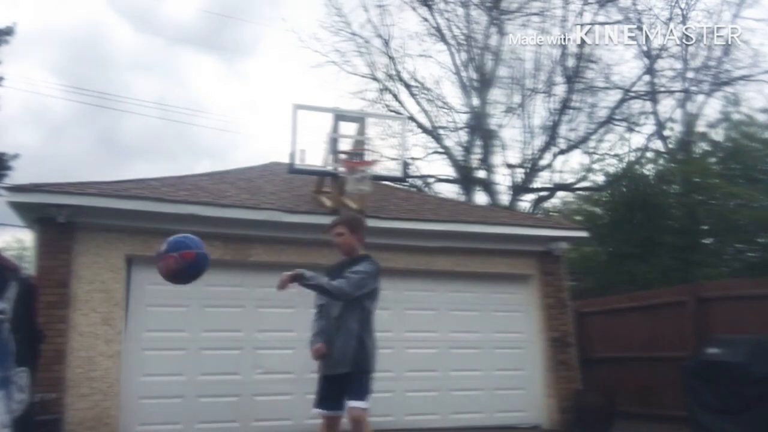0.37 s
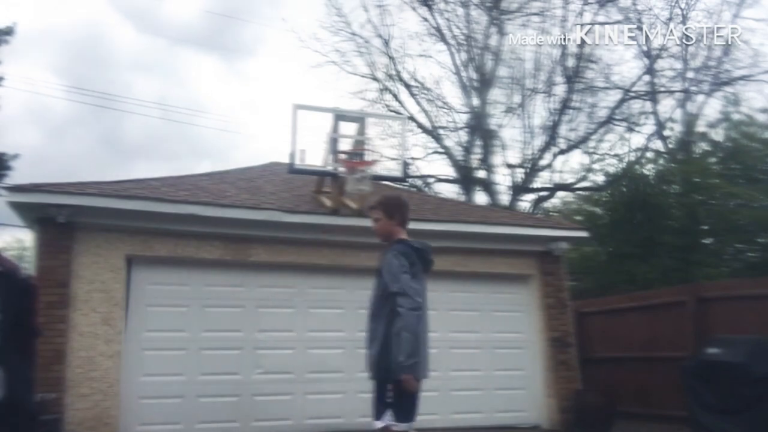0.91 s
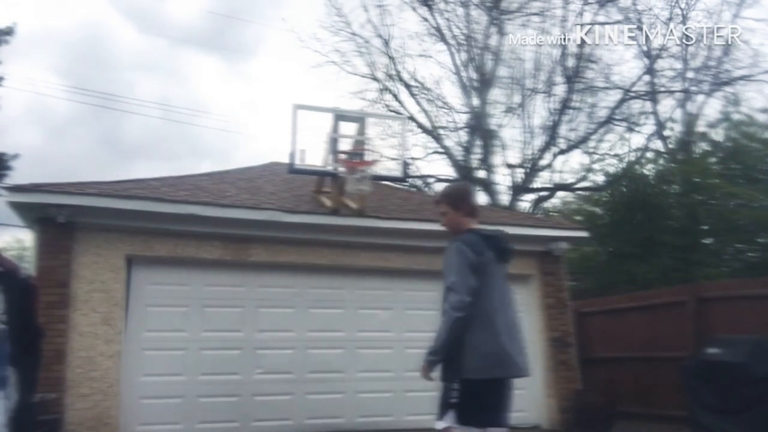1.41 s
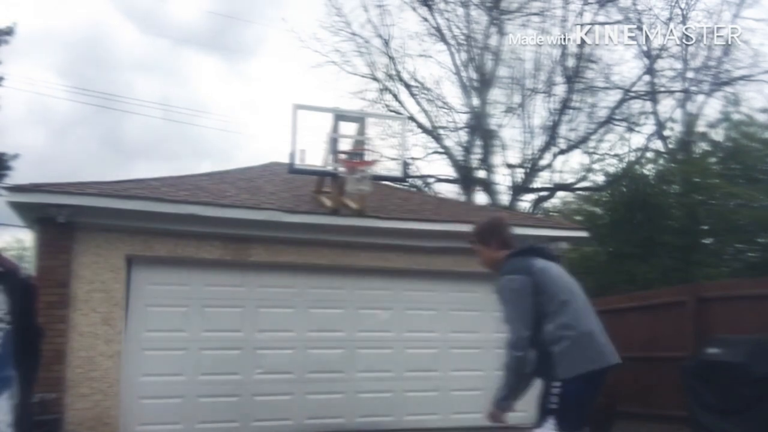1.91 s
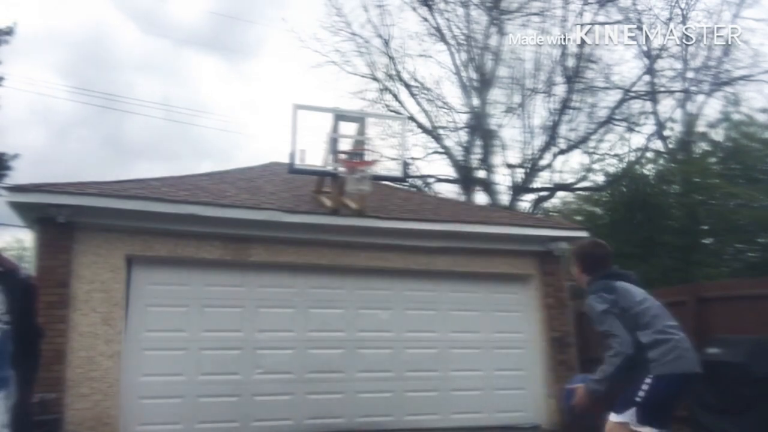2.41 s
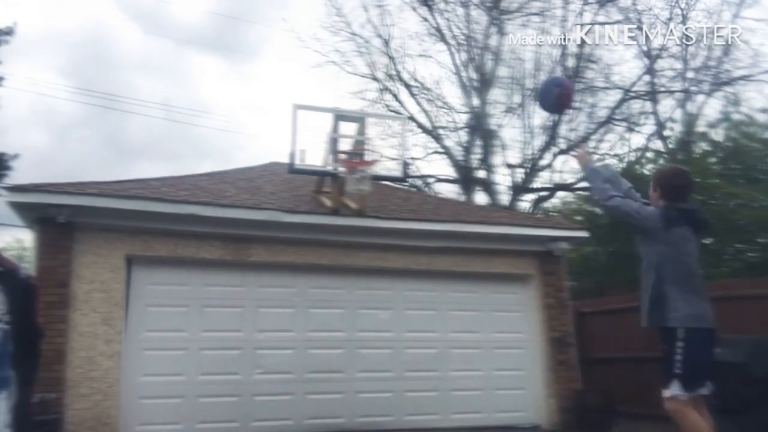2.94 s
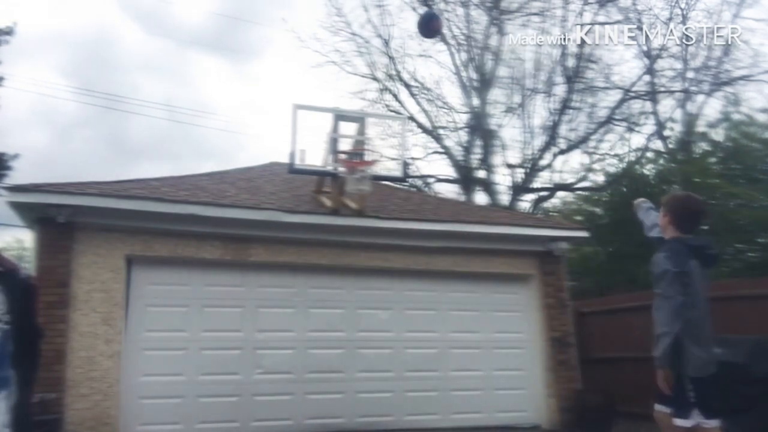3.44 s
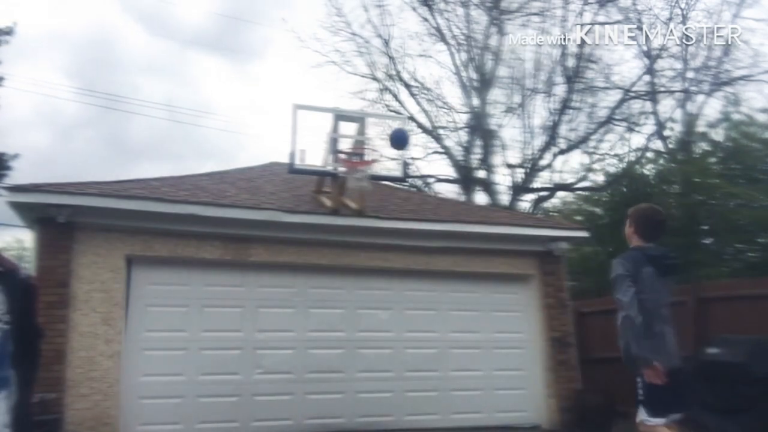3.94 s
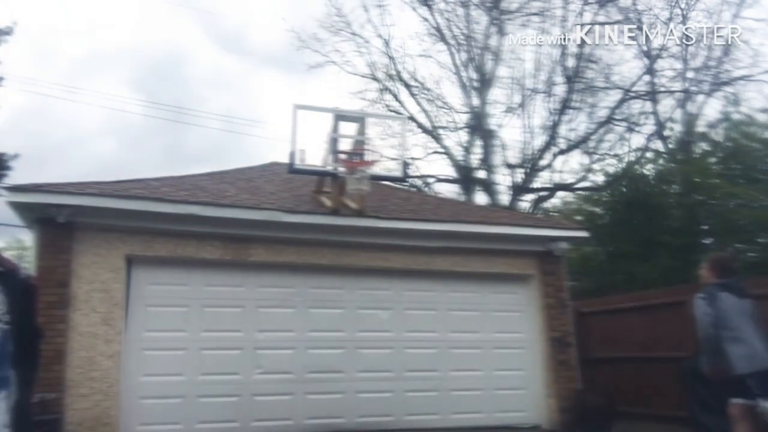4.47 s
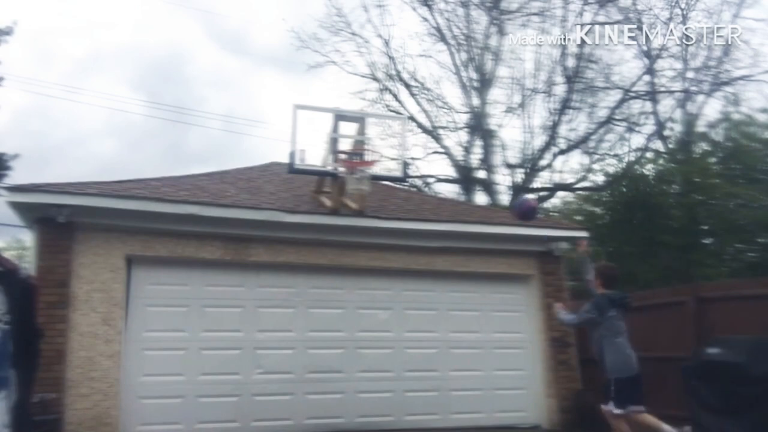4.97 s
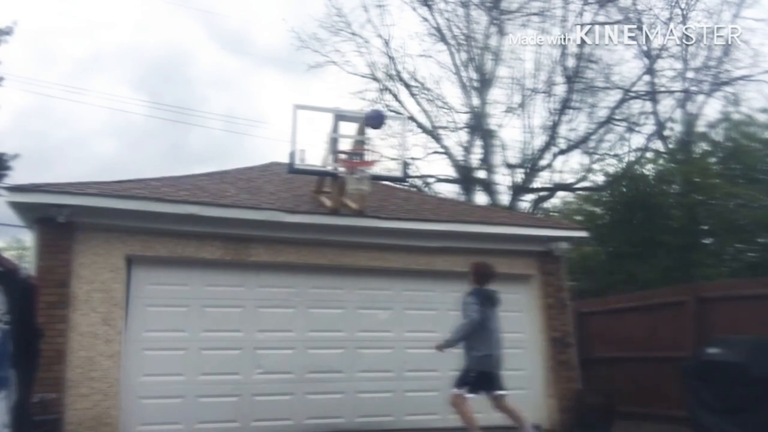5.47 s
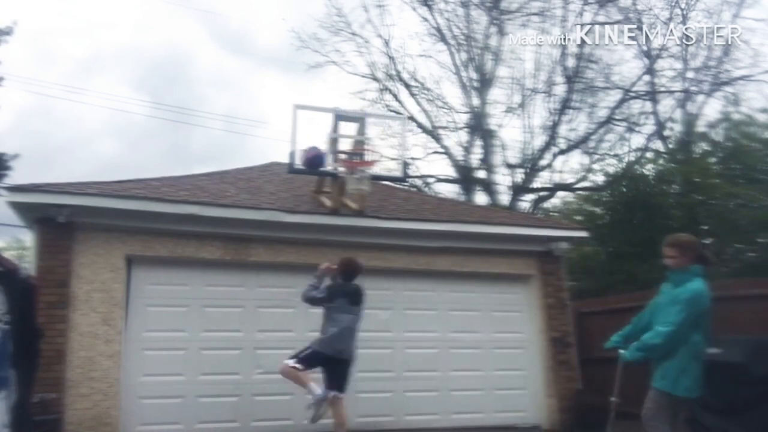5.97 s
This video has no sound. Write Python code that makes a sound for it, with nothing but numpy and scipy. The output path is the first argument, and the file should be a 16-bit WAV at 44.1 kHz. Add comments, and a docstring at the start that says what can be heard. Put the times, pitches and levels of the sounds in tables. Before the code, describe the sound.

Sharp rubbery ball slaps and ringing bounces on wet concrete, gritty scuffs between, faint rain and far traffic, with two brief level dropouts.

```python
"""Light rain hisses over far traffic, then a basketball is caught, bounced and shot on a wet concrete driveway.
Rain and traffic are shaped noise, with a wavering hum below; a bright hiss swells in bursts, probably wet jackets
rustling; near drops tick and something squeals thinly. Slaps and taps join noise bursts to short rings, the ball
rings in dying sines, scuffs, rubs and squeaks are filtered noise, with a few low soft thumps of the ball among
them, and walls nearby throw the play back. The level fades away and returns twice."""
import sys
import numpy as np
from scipy import signal
from scipy.fft import rfft, irfft
from scipy.io import wavfile
from scipy.ndimage import uniform_filter1d

SR = 44100
rng = np.random.default_rng(int(sys.argv[2]) if len(sys.argv) > 2 else 0)


def persist_wave(psi):
    """Save psi, clipped to +-1, as 16-bit WAV."""
    counts = np.round(np.clip(psi, -1, 1) * 32767).astype(np.int16)
    wavfile.write(sys.argv[1], SR, np.atleast_2d(counts).T)


N = 269661  # samples

# far traffic's loudness curve: (time_s, rumble_db)
TRAFFIC_LEVEL = [(0.0, -45), (1.0, -37), (1.26, -44.5), (1.97, -43), (2.14, -41.5), (2.6, -44),
                 (3.38, -45.5), (3.9, -42), (4.2, -45), (5.39, -47), (5.7, -41.5), (6.11, -46)]
# relative colour of the traffic rumble: (frequency_hz, density_db per Hz)
RUMBLE_COLOUR = [(13, -43), (22, -15), (42, -1.5), (91, 4), (123, -1.5), (156, 0), (253, -7.5), (300, -16),
                 (500, -18.5), (650, -26), (1100, -120)]
# a wavering hum comes and goes: (top_s, half_length_s, hum_db, octave_db)
HUMS = [(0.357, 0.43, -39, -53), (1.446, 0.26, -45.5, -50.5), (1.805, 0.26, -74, -45),
        (3.1, 0.31, -67, -48.5), (3.763, 0.14, -62, -50.5)]
# relative colour of the soft rain hiss: (frequency_hz, density_db per Hz)
HISS_COLOUR = [(180, -39), (310, 0), (417, -14.5), (550, -5.5), (653, -4.5), (1500, -0.5), (2050, -6),
               (2970, -7.5), (3570, -5.5), (7000, -23), (9100, -33), (15400, -120)]
# relative colour of the bright hiss: (frequency_hz, density_db per Hz)
BRIGHT_COLOUR = [(2940, -4.5), (5000, -1), (6020, -2), (8210, -8.5), (9830, -9), (12700, -13), (14600, -18),
                 (14900, -16), (16000, -12)]
# the bright hiss swells in bursts, probably wet jackets rustling:
# (top_s, level_db over the steady bright hiss, half_length_s)
BRIGHT_SWELLS = [(0.287, 5, 0.05), (0.868, 15.5, 0.14), (1.003, 18.5, 0.16), (1.553, 24.5, 0.075),
                 (2.403, 15.5, 0.19), (2.628, 19, 0.11), (2.84, 14.5, 0.13), (3.56, 19, 0.079),
                 (3.85, 17.5, 0.065), (4.158, 11.5, 0.041), (4.76, 7, 0.82), (5.404, 9.5, 0.21),
                 (5.59, 14, 0.025), (5.917, 20, 0.12), (6.053, 14, 0.052)]
# near drops on hard surfaces: (start_s, level_db, centre_hz)
CLEAR_DROPS = [(.637, -44.5, 8500), (0.866, -38, 7150), (1.082, -46, 8400), (2.126, -48, 6900),
               (2.640, -36.5, 9400), (2.654, -36, 9600), (2.715, -44, 10800), (4.614, -45, 9300),
               (4.633, -46, 8900), (4.879, -49.5, 10000), (5.06, -50, 11300), (5.42, -40, 12400),
               (5.438, -41.5, 7140), (5.947, -45, 10500)]
# tones of a thin metallic squeal: (pitch_hz, relative_level_db)
SQUEAL_TONES = [(3967, 2), (7490, -1.5), (10130, -5), (13590, -12)]
# when the squeal sounds: (top_s, half_length_s, level_db)
SQUEAL_TIMES = [(.7, 0.15, -67.5), (.83, 0.042, -59)]
# faint squeaks of wet rubber soles: (start_s, level_db, start_hz, end_hz, length_s)
SOLE_SQUEAKS = [(0.985, -47.5, 1350, 1350, 0.12), (2.749, -44.5, 1070, 1410, 0.03),
                (2.833, -42, 1090, 1140, 0.033), (3.173, -52.5, 1440, 1570, 0.2),
                (4.361, -48.5, 1710, 1540, 0.089), (4.478, -44.5, 1050, 1070, 0.081),
                (4.725, -44, 1310, 1380, 0.044), (4.871, -45.5, 1035, 990, 0.09)]
# scuffs and rubs, with a few low soft thumps of the ball against something:
# (start_s, body_db, centre_hz, grit_db, t60_s after the swell)
SCUFFS_AND_THUMPS = [(0.525, -26.5, 183, -57, 0.25), (.545, -32.5, 960, -40, 0.19),
                     (.59, -39.5, 826, -45, 0.43), (0.953, -32.5, 1150, -32.5, 0.051),
                     (0.965, -46, 1300, -34, 0.064), (1.152, -59, 2310, -41.5, 0.11),
                     (1.546, -32.5, 4300, -38, 0.039), (2.055, -50, 960, -40, 0.13),
                     (2.097, -41.5, 1320, -49, 0.19), (2.212, -39.5, 483, -50.5, 0.19),
                     (2.308, -30, 1050, -38, 0.16), (2.515, -31.5, 1110, -34.5, 0.13),
                     (2.552, -36.5, 950, -37, 0.064), (2.567, -39.5, 6100, -36, 0.028),
                     (2.618, -41, 3660, -40, 0.28), (2.87, -33, 1230, -48, 0.043),
                     (3.06, -47.5, 990, -49.5, 1), (3.862, -35.5, 472, -37.5, 0.27),
                     (3.922, -41.5, 504, -49, 0.12), (4.477, -46.5, 1020, -52.5, 0.5),
                     (4.486, -38.5, 400, -45.5, 0.46), (4.874, -46, 1090, -49.5, 0.39),
                     (4.931, -45.5, 2800, -48.5, .2), (5.261, -42, 1080, -40, 0.2),
                     (5.426, -43.5, 1430, -50, 0.078), (5.536, -32.5, 1360, -32, 0.27),
                     (5.543, -31, 4500, -35, 0.05), (5.82, -47.5, 1164, -44, 0.66),
                     (5.915, -44, 1030, -37.5, 0.25), (6.04, -41, 1030, -39, 0.12)]
# tight hollow taps of the ball's skin and juddering rubber: (start_s, level_db, pitch_hz)
TAPS = [(.556, -24, 2070), (.565, -21, 910), (0.6, -29, 1510), (.611, -45, 1200), (.91, -19, 1790),
        (0.963, -18.5, 1360), (1.532, -33, 1360), (2.031, -27, 1470), (2.326, -24, 1570),
        (2.333, -19, 1460), (2.345, -15.5, 1365), (2.358, -21.5, 1560), (2.54, -28, 1350),
        (5.585, -27, 1400)]
# slaps of ball, hands and soles, and their strongest echoes:
# (start_s, body_db, centre_hz, crack_db, crack_tilt_db per octave)
SLAPS = [(0.5133, -12, 1850, -9, 8), (.526, -26, 1290, -39, -1), (0.54, -23, 2070, -36, 6),
         (0.547, -22, 860, -16.5, 2.5), (.642, -31.5, 259, -38, 3), (0.931, -13.5, 1490, -19, 12),
         (0.94, -19.5, 1020, -14, 8), (0.965, -23, 1130, -19, 0), (0.9745, -45, 1300, -15, 4.5),
         (1.5043, -16, 1000, -15, 2), (1.5155, -20.5, 1600, -4, 3), (1.541, -25.5, 1190, -21, 6),
         (1.545, -43, 1050, -13.5, 4.5), (2.017, -14, 1180, -11, -10), (2.043, -35, 1600, -21.5, -10),
         (2.047, -19.5, 960, -34, -5), (2.21, -30.5, 1540, -49, -9), (2.225, -32.5, 467, -37, -12),
         (2.528, -28, 1200, -21.5, 4), (2.678, -31.5, 1590, -39, 18), (2.845, -37, 1150, -36, 0),
         (2.885, -32, 1270, -49, 1), (3.039, -29, 1090, -19, -4), (3.061, -55, 1310, -21.5, 1),
         (3.862, -22, 1050, -34, -11), (3.871, -32, 520, -40, -11), (3.877, -24.5, 480, -22, -15),
         (3.885, -33, 420, -30, -5), (3.921, -33, 710, -32, -3), (4.479, -36, 1000, -45, -5),
         (5.42, -38, 1410, -25.5, -11), (5.56, -22, 2560, -23, -11), (5.569, -20.5, 1340, -15, -9),
         (5.576, -14.5, 930, -32, 6), (5.624, -26.5, 1430, -46, -5), (5.678, -35, 1900, -36, -8),
         (5.826, -32.5, 1180, -30, -13), (5.914, -47, 1032, -21, 0.5), (6.045, -37, 1060, -27, -24)]
# relative colour of wet contact on concrete, before any tilt: (frequency_hz, density_db per Hz)
CONTACT_COLOUR = [(880, -66), (1500, -13.5), (1950, -2), (2860, 5), (4120, 4), (6060, -5), (8500, -13.5),
                  (9750, -16), (13300, -28.5), (15100, -35), (16000, -47)]
# ball meets the ground, and its strongest echoes:
# (start_s, thud_db, knock_db, inside_air_db, ring_time_factor)
BOUNCES = [(0.929, -34, -29, -36.5, 1.45), (1.506, -35, -28.5, -33.5, 0.95),
           (2.017, -32.5, -31.5, -40.5, 0.71), (2.211, -66, -49, -36, 0.69), (3.878, -25, -26, -30, 0.32),
           (3.921, -62, -31, -34, 0.5), (5.5777, -16.5, -27, -30, 0.82), (5.6289, -23, -49, -50, 1.16)]
# ring of the ball's deep shell: (pitch_hz, relative_level_db, t60_s before the ring time factor)
DEEP_SHELL = [(82.3, 8.5, 0.15)]
# ring of the ball's upper shell: (pitch_hz, relative_level_db, t60_s before the ring time factor)
UPPER_SHELL = [(162.5, 10, 0.13), (206.7, -2.5, 0.23), (265, 2.5, 0.088)]
# ring of the air inside the ball: (pitch_hz, relative_level_db, t60_s before the ring time factor)
INSIDE_AIR = [(406.7, 2, 0.26), (425.5, -3, 0.26), (1090, -0.5, 0.19)]
# how long the yard's reflections last: (frequency_hz, t60_s)
YARD_DECAY = [(100, 0.69), (500, 0.28), (2000, 0.22), (14000, 0.1)]
# dips from surfaces close to the microphone: (centre_hz, width_hz, share taken out at full depth)
CLOSE_SURFACES = [(3200, 450, .75), (4800, 700, .8), (8050, 450, .55), (10550, 800, .6)]
# the level fades straight down and comes back up; the gap is silent, and empty if it ends before it begins:
# (fade_start_s, lowest_s, full_again_s, gap_from_s, gap_to_s)
LEVEL_FADES = [(3.538, 3.72, 3.7195, 3.72, 3.719), (3.937, 3.991, 4.153, 3.984, 4.013)]

SLAP_RISE_S = 0.00148


def gain_of(db):
    """Decibels to an amplitude factor."""
    return 10 ** (np.asarray(db) / 20)


def evened(x):
    """Scales to rms 1."""
    return x / np.sqrt(np.mean(x ** 2) + 1e-20)


def read(points, hz):
    """Reads a frequency curve on a log axis."""
    f, value = np.transpose(points)
    return np.interp(np.log(hz + 1), np.log(f + 1), value)


def column(rows, count):
    """One column of a time curve at every sample."""
    rows = np.array(rows)
    return np.interp(np.arange(N) / SR, rows[:, 0], rows[:, count])


def bell(top_s, half_s):
    """A smooth rise and fall of height 1, down to 1/e at half_s from its top."""
    return np.exp(-((np.arange(N) / SR - top_s) / half_s) ** 2)


def smoothed_twice(x, size):
    """Two running averages turn noise into a slow wander."""
    return uniform_filter1d(uniform_filter1d(x, size=size), size=size)


def swell_in(t, rise_s):
    """A sine-squared rise from 0 to 1."""
    return np.sin(np.pi / 2 * np.minimum(t / rise_s, 1)) ** 2


def add(mix, s, sound):
    """Mixes a sound in at a time."""
    part = mix[round(s * SR):][:len(sound)]
    part += sound[:len(part)]


def resonate(x, hz, width):
    """A resonance of gain 1, fixed or gliding: shift down to 0 Hz, smooth, shift back."""
    turn = np.exp(2j * np.pi * np.cumsum(hz * np.ones(len(x))) / SR)
    r = np.exp(-np.pi * width / SR)
    return 2 * (turn * signal.lfilter([1 - r], [1, -r], x / turn)).real


def noise(spectrum, patchy_db, size=1024):
    """Coloured noise from random short-time spectra with drifting loud and soft patches."""
    frames = 4 * N // size + 5
    hz = np.fft.rfftfreq(size, 1 / SR)
    a, b, patches = rng.standard_normal((frames, len(hz), 3)).T
    patches = uniform_filter1d(patches, size=12, axis=0)
    patches = evened(uniform_filter1d(patches, size=10, axis=1))
    z = (a + 1j * b) * gain_of(read(spectrum, hz)[:, None] + patchy_db * patches)
    return evened(signal.istft(z, nperseg=size, noverlap=3 * size // 4)[1][:N])


def spatter(spread_db, hold_s):
    """A jumpy loudness, as of many small drops and grains of grit, some 1500 a second."""
    hit = rng.random(N) < 1500 / SR
    size = gain_of(spread_db * np.minimum(rng.exponential(1, N), 5)) * hit
    return evened(6.0 + signal.lfilter([1], [1, -np.exp(-1 / (hold_s * SR))], size))


def colours(hz, width_hz, tilt_db, size):
    """Two noises of rms 1: a body around a centre, and a broad bright one."""
    a, b = rng.standard_normal((2, size))
    narrow = resonate(resonate(a, hz, width_hz), hz, width_hz)
    body = evened(resonate(narrow, hz, 2 * width_hz))
    f = np.fft.rfftfreq(size, 1 / SR)
    tilt = tilt_db * np.log2(np.clip(f, 1500, SR) / 4000)
    return body, evened(irfft(rfft(b) * gain_of(read(CONTACT_COLOUR, f) + tilt), size))


def shaped(x, shape):
    """Noise under an envelope, with the energy of the envelope itself."""
    return shape * x * np.linalg.norm(shape) / np.linalg.norm(shape * x)


def traffic():
    """Low patchy noise, with a hum that wavers in pitch and its octave."""
    hum_hz = 78.6  # middle of the waver
    waver = evened(smoothed_twice(rng.standard_normal(N), 4000))
    turns = np.cumsum(hum_hz * (1 + 0.015 * waver)) / SR
    hum, octave = (np.sqrt(2) * np.sin(2 * np.pi * k * turns) for k in (1, 2))
    out = gain_of(column(TRAFFIC_LEVEL, count=1)) * noise(RUMBLE_COLOUR, 1.84, size=4096)
    for s, half, db, octave_db in HUMS:
        out += bell(s, half) * (gain_of(db) * hum + gain_of(octave_db) * octave)
    return out


def rain_and_rustle():
    """A soft rain hiss, and a bright hiss that swells in bursts (probably wet jackets) and lifts it slightly."""
    soft_db, bright_db, soft_share = -50, -71.5, 0.25  # steady levels; share of the swells the soft hiss follows
    swell_power = sum(gain_of(2 * db) * bell(s, half) ** 2 for s, db, half in BRIGHT_SWELLS)
    swell_db = 10 * np.log10(1 + swell_power)
    soft = noise(HISS_COLOUR, 1.2) * spatter(0.9, 0.0063)
    bright = noise(BRIGHT_COLOUR, 3.9, size=256) * spatter(3.2, 0.0015)
    return gain_of(soft_db + soft_share * swell_db) * soft + gain_of(bright_db + swell_db) * bright


def drops():
    """Short ticks of resonant noise: the clear drops, and a random patter of faint ones."""
    patter_per_s, patter_floor_db, low_hz, high_hz = 6, -67.5, 10000, 15200
    tick_t60_s, tick_rise_s, width_share = 0.015, 0.00062, 0.27  # width as a share of the centre
    out, t = np.zeros(N), np.arange(1000) / SR
    wait, size, pitch = rng.random((200, 3)).T
    patter_s = np.cumsum(-np.log(wait)) / patter_per_s
    patter_db = patter_floor_db - 3.66 * np.log(size)
    patter = zip(patter_s, patter_db, low_hz * (high_hz / low_hz) ** pitch)
    rows = CLEAR_DROPS + [row for row in patter if row[0] < N / SR]
    for s, db, hz in rows:
        tap = rng.standard_normal(len(t))
        tick = evened(resonate(resonate(tap, hz, width_share * hz), hz, width_share * hz))
        add(out, s, gain_of(db - 60 * t / tick_t60_s) * np.minimum(t / tick_rise_s, 1) * tick)
    return out


def squeal():
    """Fuzzy high tones of narrow noise that come and go together, each breaking up in its own way."""
    tones = np.zeros(N)
    for hz, db in SQUEAL_TONES:
        rub, catch = rng.standard_normal((2, N))
        catch_db = 4.9 * evened(smoothed_twice(catch, 500))
        tones += gain_of(db + catch_db) * evened(resonate(resonate(rub, hz, 200), hz, 200))
    return tones * sum(gain_of(db) * bell(s, half) for s, half, db in SQUEAL_TIMES)


def squeaks():
    """Fuzzy gliding whistles of rubber on wet concrete: noise through a gliding resonance."""
    out = np.zeros(N)
    for s, db, start_hz, end_hz, length in SOLE_SQUEAKS:
        hz = np.linspace(start_hz, end_hz, round(length * SR))
        rub = rng.standard_normal(len(hz))
        tone = evened(resonate(resonate(rub, hz, 240), hz, 240))
        add(out, s, gain_of(db) * tone * signal.windows.tukey(len(hz), 0.45))
    return out


def scuffs_and_thumps():
    """Gritty noise that swells and dies, longer to swell when louder; low centres give soft thumps of the ball."""
    soft_db, soft_rise_s, rise_per_db, longest_rise_s = -37.5, 0.0068, 0.02, 0.048
    out, t = np.zeros(N), np.arange(16000) / SR
    for s, db, hz, grit_db, t60 in SCUFFS_AND_THUMPS:
        body, grit = colours(hz, 1050, -0.75, size=len(t))
        over_soft_db = max(db, grit_db) - soft_db
        rise = min(soft_rise_s * np.exp(rise_per_db * over_soft_db), longest_rise_s)
        fall = gain_of(-60 * (np.maximum(t - rise, 0) / t60) ** 1.217)
        add(out, s, swell_in(t, rise) * fall * (gain_of(db) * body + gain_of(grit_db) * grit))
    return out * uniform_filter1d(spatter(4.6, 0.002), size=16)


def taps():
    """Each tap is a short pitched ring with a weaker overtone, cut off as the contact ends."""
    t60_s, rise_s = 0.01, 0.0013
    out, t = np.zeros(N), np.arange(2000) / SR
    shape = gain_of(-60 * (t / t60_s) ** 2) * np.minimum(t / rise_s, 1)
    for s, db, hz in TAPS:
        tone = np.sin(2 * np.pi * hz * t) + 0.19 * np.sin(2 * np.pi * 1.7 * hz * t)
        add(out, s, gain_of(db) * shape * tone)
    return out


def snap(tilt_db, shape):
    """A click, its ground mirror and a short fizz through the causal colour of the wet contact."""
    click_db, mirror_db, mirror_delay_s = 18.5, -3, 0.0009  # click over the fizz, mirror over the click
    size = len(shape)
    f = abs(np.fft.fftfreq(size, 1 / SR))
    tilt = tilt_db * np.log2(np.clip(f, 1500, SR) / 4000)
    log_gain = np.log(gain_of(np.maximum(read(CONTACT_COLOUR, f) + tilt, -100)))
    # minimum phase, so the colour never sounds ahead of the click
    colour = np.fft.ifft(np.exp(np.conj(signal.hilbert(log_gain)))).real[:size // 2]
    drive = shape * rng.standard_normal(size)
    at = round(SLAP_RISE_S * SR)
    delay = round(mirror_delay_s * SR * rng.uniform(0.6, 1.1))  # varies from slap to slap
    drive[at] += gain_of(click_db) * shape.max()
    drive[at + delay] += gain_of(click_db + mirror_db) * shape.max()
    sound = signal.fftconvolve(drive, colour)[:size]
    return sound * np.linalg.norm(shape) / np.linalg.norm(sound)


def slaps():
    """One broad push, a crack of a few ms and a noise body that lasts somewhat longer."""
    body_t60_s, push_db, push_cycles = 0.033, 1, 2.8  # push level over the body, cycles until it has died
    out, t = np.zeros(N), np.arange(4000) / SR
    fall_db = -60 * t / body_t60_s
    start = swell_in(t, SLAP_RISE_S)
    for s, db, hz, crack_db, tilt_db in SLAPS:
        body = colours(hz, 0.9 * hz, tilt_db, size=len(t))[0]
        push = gain_of(push_db - 60 * hz * t / push_cycles) * np.sin(2 * np.pi * hz * t)
        add(out, s, gain_of(db) * shaped(body, start * gain_of(fall_db)))
        add(out, s + SLAP_RISE_S / 2, gain_of(db) * push)
        # the crack dies 2.67 times as fast as the body
        add(out, s, gain_of(crack_db) * snap(tilt_db, start * gain_of(2.67 * fall_db)))
    return out


def ring(modes, stretch, damping=1):
    """Dying sines of one blow; damping over 1 holds the level first and then cuts it short."""
    t = np.arange(SR // 2) / SR
    out = np.zeros(len(t))
    for hz, db, t60 in modes:
        out += gain_of(db - 60 * (t / (t60 * stretch)) ** damping) * np.sin(2 * np.pi * hz * t)
    return out


def ball():
    """The shell thuds and knocks over a few ms of contact; the air inside rings at once."""
    out = np.zeros(N)
    contact = 1 - np.exp(-np.arange(SR // 2) / (0.0059 * SR))
    for s, thud_db, knock_db, air_db, stretch in BOUNCES:
        thud = gain_of(thud_db) * ring(DEEP_SHELL, stretch, damping=1.49)
        knock = gain_of(knock_db) * ring(UPPER_SHELL, stretch)
        air = gain_of(air_db) * ring(INSIDE_AIR, stretch)
        add(out, s, contact * (thud + knock) + air)
    return out


def yard(x):
    """Sparse reflections of random sign from house, fence and ground, treble dying first."""
    reflections = np.zeros(SR // 2)
    at = np.arange(300, len(reflections) - 20, 20)
    reflections[at + rng.integers(0, 20, len(at))] = rng.choice([-1., 1.], len(at))
    hz, t, z = signal.stft(reflections, SR, nperseg=256)
    decay = gain_of(-60 * t / read(YARD_DECAY, hz)[:, None])
    tail = signal.istft(z * decay, SR, nperseg=256)[1]
    return signal.fftconvolve(x, tail / np.linalg.norm(tail))[:N]


def dips(x, depth):
    """Close surfaces hollow out bands of the sound, to a depth of 0 to 1."""
    for hz, width, share in CLOSE_SURFACES:
        band = signal.lfilter(*signal.iirpeak(hz, hz / width, SR), x)
        x = x - np.clip(depth, 0, 1) * share * band
    return x


def scene():
    """Play on the drive and its reflections, in rain and far traffic; dips are deep for the direct play."""
    play = ball() + slaps() + taps() + scuffs_and_thumps() + squeaks()
    # bass escapes to the open sky
    no_bass = signal.butter(2, 220, "highpass", fs=SR, output="sos")
    thrown_back = gain_of(-12.0) * signal.sosfilt(no_bass, yard(play))
    diffuse = dips(thrown_back + rain_and_rustle(), 0.43)
    return (dips(play, 0.87) + diffuse + traffic() + squeal() + drops())[None]


def top_cut(x):
    """Nothing passes above the cut-off."""
    return signal.sosfilt(signal.butter(12, 16500, fs=SR, output="sos"), x)


def record(dry):
    """The microphone drops the deepest bass; the top is band-limited and the level fades away twice."""
    edge_hz = 15780
    no_deep_bass = signal.butter(3, 40, "highpass", fs=SR, output="sos")
    heard = signal.sosfilt(no_deep_bass, dry)
    low_pass = signal.firwin(511, edge_hz, window=("kaiser", 6), fs=SR)
    heard = signal.oaconvolve(heard, low_pass[None], "same")
    t = np.arange(N) / SR
    for start, low, full, gap_from, gap_to in LEVEL_FADES:
        outside_gap = (t < gap_from) | (t > gap_to)
        heard = heard * np.interp(t, [start, low, full], [1, 0, 1]) * outside_gap
    return top_cut(heard)


dry = scene()
out = record(dry)
persist_wave(out)
```